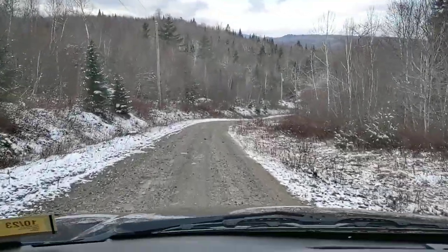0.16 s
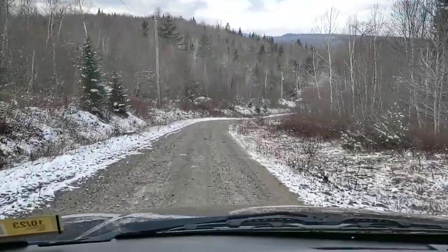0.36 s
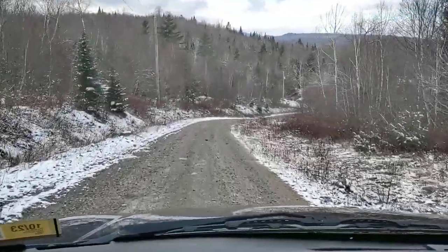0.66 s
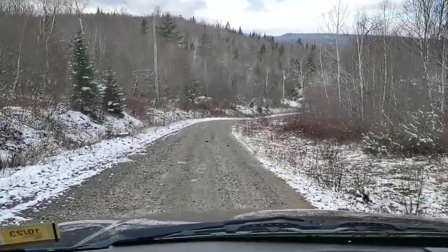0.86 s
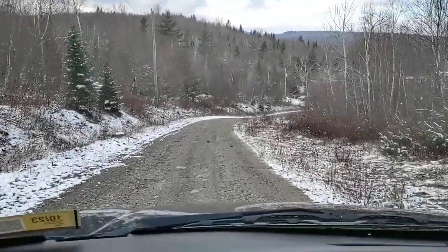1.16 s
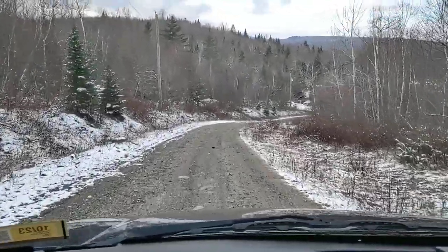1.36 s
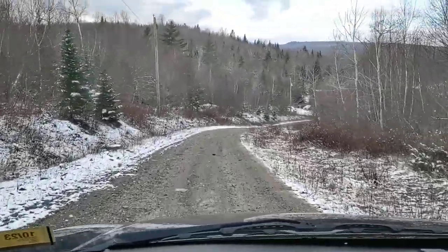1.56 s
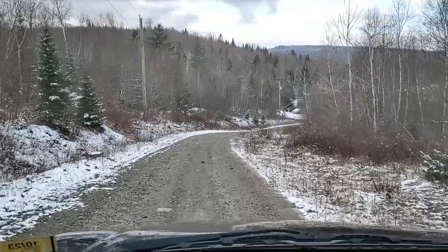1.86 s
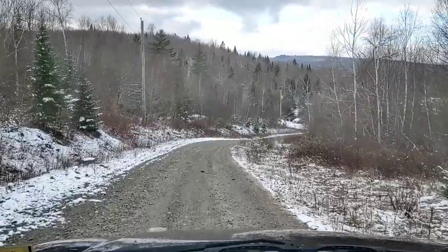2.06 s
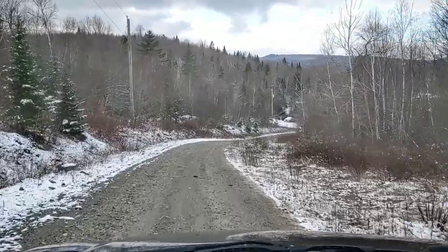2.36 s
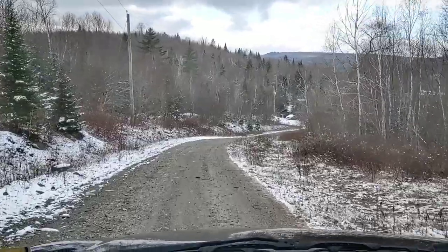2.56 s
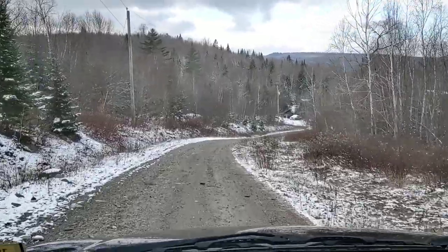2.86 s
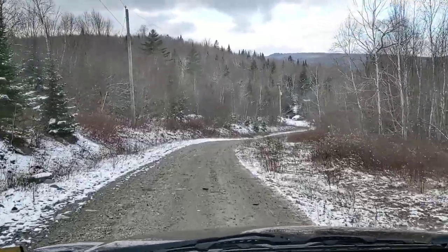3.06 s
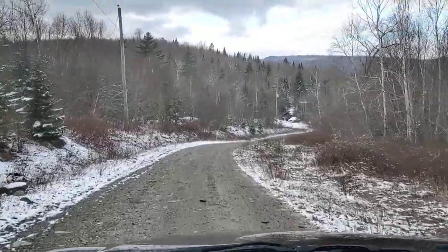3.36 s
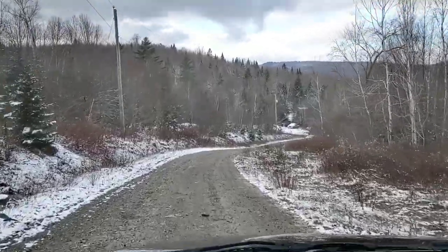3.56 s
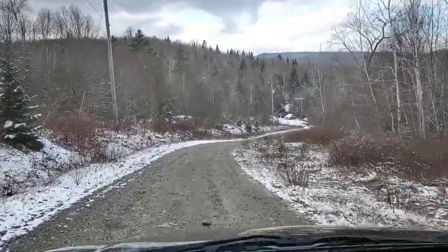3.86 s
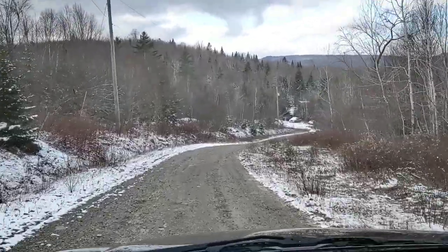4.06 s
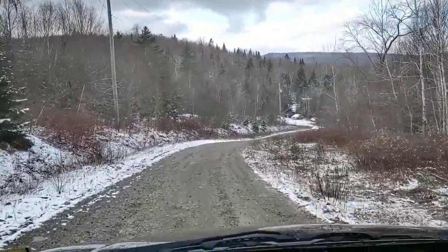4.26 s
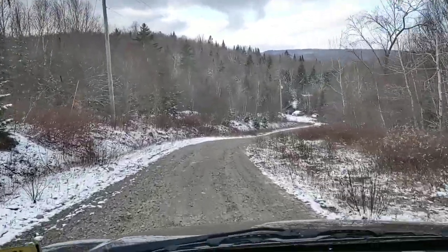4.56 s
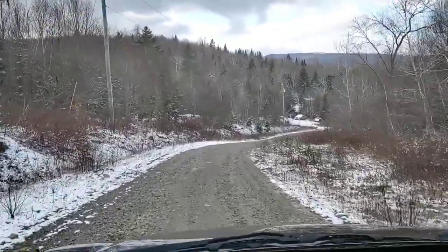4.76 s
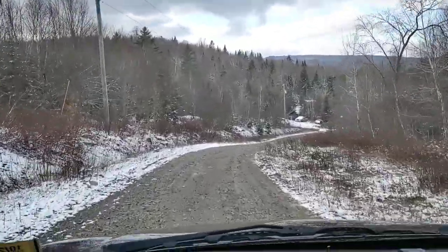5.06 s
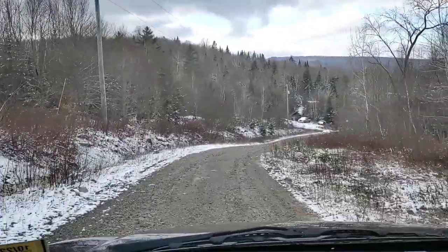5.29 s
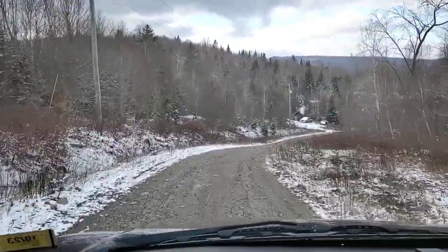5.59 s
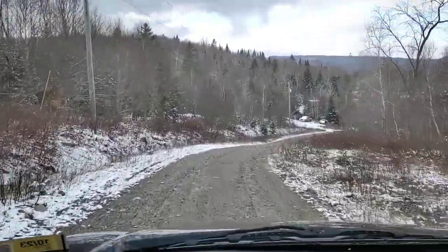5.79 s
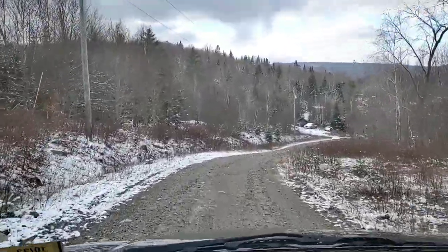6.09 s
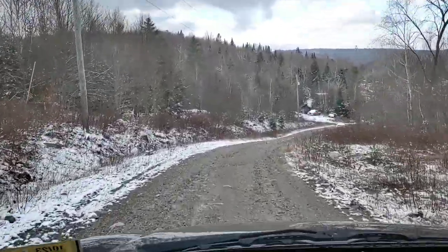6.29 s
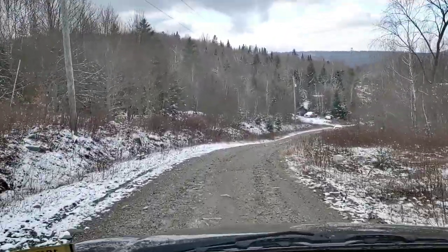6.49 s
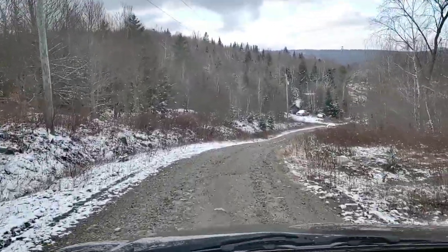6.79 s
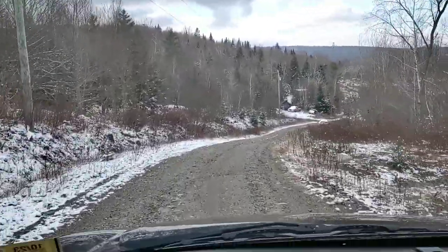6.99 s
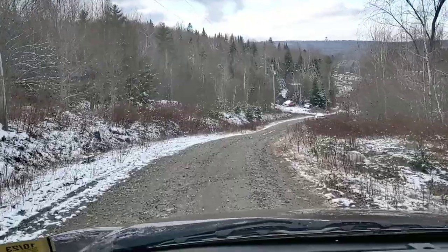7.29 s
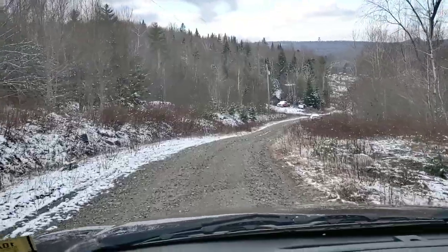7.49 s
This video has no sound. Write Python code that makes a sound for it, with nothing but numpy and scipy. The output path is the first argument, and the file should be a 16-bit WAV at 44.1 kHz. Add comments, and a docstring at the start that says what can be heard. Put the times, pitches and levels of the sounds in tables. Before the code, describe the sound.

Low droning cabin rumble as a vehicle rolls over gravel, with fine crunching and irregular clicks and knocks of stones striking the underbody.

```python
"""Inside a car rolling along a gravel road. The tyres shake the body: resonances boom and drone in the cabin.
Bumps thud as damped low tones; gravel crunches under the treads as noise, pings and short ticks.
Thrown stones tick and knock on the floor panels and wheel arches, noise bursts exciting panel modes.
The drive line whines faintly, a tone of wandering pitch; a narrow hiss of filtered noise shows at first."""
import sys
import numpy as np
from scipy import signal
from scipy.fft import rfft, irfft, next_fast_len
from scipy.io import wavfile
from scipy.ndimage import uniform_filter1d, map_coordinates

SR = 44100
rng = np.random.default_rng(int(sys.argv[2]) if len(sys.argv) > 2 else 0)


def dump_mix(stems):
    """Bounce the given channels to the path in sys.argv[1] as a 16-bit WAV at rate SR."""
    frames = np.atleast_2d(stems).T  # one column per channel
    limited = np.clip(frames, -1, 1)  # hard clip at full scale
    pcm = np.round(limited * 32767).astype(np.int16)
    wavfile.write(sys.argv[1], SR, pcm)


N = 336924

# Road roughness, as the body drone's level before fast shaking: time_s, level_db
ROAD_ROUGHNESS = [(0, -61.5), (.57, -60), (.66, -55), (.72, -62), (.86, -60), (.94, -53), (1.08, -51),
                  (1.25, -55), (1.45, -58.5), (1.62, -49), (1.8, -52.5), (2.2, -53.5), (2.62, -53.5),
                  (2.68, -59), (2.76, -54.5), (3.02, -56.5), (3.27, -48), (3.37, -54.5), (3.55, -54.5),
                  (3.85, -51.5), (4.04, -55), (4.19, -58.5), (4.4, -54.5), (4.7, -60), (5.13, -59),
                  (5.3, -53.5), (5.62, -53.5), (5.79, -53.5), (6.11, -53), (6.26, -52.5), (6.94, -52.5),
                  (7.17, -56), (7.34, -53.5), (7.64, -55)]
# Cabin boom relative to the drone: time_s, excess_db
BOOM_EXCESS = [(0, 0.5), (.3, 8), (.78, 0.5), (1.08, 2), (1.3, 4.5), (1.62, 6), (2.0, 5.5), (2.62, 3),
               (2.85, 9.5), (3.2, 0), (3.68, 2.5), (4.0, 9), (4.19, 3.5), (4.38, 10), (4.55, 2.5), (4.9, 6),
               (5.4, 9), (6.2, 7.5), (6.83, 1.5), (7.0, 11), (7.64, 3)]
# Crunch relative to what the roughness gives: time_s, excess_db
CRUNCH_EXCESS = [(0, 1), (.5, 2), (.82, 1), (1.1, 0), (1.4, 0), (1.7, 2.2), (2.1, 2), (2.55, 2), (2.9, 2),
                 (3.3, 0.1), (3.7, 0.7), (4.0, 2.5), (4.4, 0.1), (4.9, 0.5), (5.4, -0.5), (5.9, 2),
                 (6.4, 0), (6.9, 0.1), (7.1, 4.5), (7.25, -1.5), (7.4, 1.5), (7.64, -1.5)]
# Drive-line tone, before its fast wander: time_s, pitch_hz
WHINE_PITCH = [(0, 1133), (4.3, 1135), (4.8, 1122), (5.3, 1150), (6.6, 1112), (7.64, 1160)]
# Wheels dropping over bumps: start_s, pitch_hz, level_db (peak of the swell)
BUMPS = [(.608, 61.5, -44), (.652, 105, -45), (0.756, 88.5, -44), (.92, 51.5, -44), (.99, 66, -43),
         (1.056, 55, -40), (1.11, 55, -40), (1.6, 55, -34.5), (1.848, 59.3, -37), (5.399, 55, -41),
         (5.763, 64, -39), (6.642, 59.3, -36.5)]
# Thrown stones: arrival_s, strongest_pitch_hz, knock_db, crack_db, tick_db, left_over_right_db
STONES = [(0.352, 1040, -52.5, -64.5, -75.5, 0), (0.742, 1740, -69, -67, -101, 4),
          (0.934, 658, -56.5, -65, -81, 1), (0.959, 2000, -68, -67, -84, 6), (1, 1370, -59, -59, -73, 0),
          (1.0878, 210, -44, -69, -87, 1), (1.106, 172, -49, -74, -90, 0), (1.121, 2500, -63, -65, -90, -1),
          (1.154, 1330, -68, -61, -93, 1), (1.197, 1320, -59, -66, -81, 6),
          (1.4336, 629, -52, -57.5, -81, 1), (1.44, 1024, -54, -56.5, -72.5, -1),
          (1.501, 1940, -51, -64, -77, -2), (1.595, 423, -45, -62, -74, -1),
          (1.6055, 2910, -48.5, -57, -59, 6), (1.652, 1440, -55, -54, -92, 4.5),
          (1.72, 513, -46, -67, -76, 1), (1.87, 750, -49, -84, -96, 5), (1.9525, 1440, -44, -53.5, -94, 0),
          (1.967, 1520, -45.5, -58, -87, 2), (2.148, 710, -44, -46, -58, 2.5),
          (2.2038, 2620, -64, -52.5, -63, 3.5), (2.2145, 710, -48.5, -56.5, -86, 1),
          (2.247, 2440, -65, -61, -86, 5), (2.444, 1470, -49, -53.5, -74, 4.5),
          (2.4535, 1400, -48.5, -59, -80, 0), (2.471, 565, -43.5, -77, -93, -0.5),
          (2.479, 860, -45.5, -72, -93, 1), (2.488, 520, -46.5, -77, -93, 0),
          (2.529, 2870, -75, -65, -87, 1), (2.563, 4570, -82, -73, -73, -1),
          (2.574, 2900, -75, -71, -70, 0), (2.654, 4430, -75, -70, -68.5, 0),
          (2.729, 694, -64, -71, -78, -3), (2.99, 1480, -60, -67, -98, -12),
          (3.117, 1300, -70, -61.5, -67.5, 1), (3.139, 1330, -61, -60, -85, 4),
          (3.2, 816, -56.5, -55.5, -92, 5), (3.271, 760, -53, -69, -92, 7),
          (3.528, 1500, -50, -52.5, -70, -1), (3.543, 910, -60, -63, -87, 0),
          (3.5701, 2390, -75, -48, -70, 1.5), (3.582, 3030, -75, -59, -79, -1),
          (3.627, 1500, -60, -72, -90, 0), (3.651, 2940, -79, -63, -93, -4),
          (3.7062, 382, -59, -74, -83, -8), (3.738, 1445, -58, -60, -74, 2),
          (3.753, 2030, -63, -62, -69, 3), (3.789, 720, -50.5, -61, -83, 1),
          (3.838, 3070, -53, -57.5, -66, 2), (3.974, 655, -69, -82, -84, -3),
          (4.249, 563, -58, -81, -94, -7), (4.3054, 747, -42.5, -47.5, -63, -1),
          (4.498, 730, -58, -79, -91, -3), (4.957, 3760, -57.5, -70, -81, -1),
          (5.311, 1940, -53.5, -71, -77, 5), (5.371, 663, -56, -78, -87, 0),
          (5.598, 2400, -70, -66, -71, 1), (5.7606, 1870, -65, -66, -78, 0),
          (5.8576, 1670, -50.5, -62, -74, 1), (5.895, 1300, -59, -64, -82, -2),
          (6.042, 1920, -64, -64, -68, 6), (6.109, 1210, -58, -58.5, -74, 2),
          (6.159, 530, -53, -67, -81, 3), (6.2, 1990, -51, -71, -75, 1), (6.371, 5740, -70, -77, -68.5, 1),
          (6.406, 2250, -69, -69, -78, -1), (6.449, 400, -49.5, -81, -90, 1),
          (6.517, 560, -54.5, -66, -79, 2), (6.608, 297, -49, -82, -90, -2), (6.64, 1970, -69, -71, -84, 2),
          (6.698, 1390, -68, -62, -73, 2), (6.789, 1320, -69, -67, -79, -3),
          (6.856, 2140, -52.5, -72, -69, 0), (6.885, 4900, -71, -77, -65.5, 2),
          (6.915, 721, -56, -72, -86, -1), (6.934, 2020, -68, -78, -86, 3),
          (7.035, 1320, -58, -70, -90, -1), (7.07, 628, -56, -68, -88, 0),
          (7.1192, 1190, -67, -66, -87, -2), (7.209, 1260, -67, -63, -82, 0),
          (7.294, 1950, -55, -71, -82, -3), (7.506, 1230, -73, -56, -74, 1.5)]
# Modes of the struck panels: centre_hz, width_hz, gain_db
PANEL_MODES = [(200, 90, -6), (376, 138, -0.5), (494, 102, 1.5), (741, 98, -2), (1006, 164, -4),
               (1167, 194, -1), (1490, 300, -0.5), (2195, 580, 1.5), (2970, 580, 1), (3810, 720, -0.5),
               (4610, 840, 2.5), (5960, 2040, -2.5), (7260, 610, 0.5), (9500, 1800, -5.5)]
# Three bands of a stone's blow (knock, crack, tick): low_edge_hz, high_edge_hz
BLOW_BANDS = [(140, 1000), (1000, 3400), (3400, 13000)]
# Build-up time constant of each band; the low ring takes longest: rise_s
BAND_RISE_S = [0.0025, 0.0003, 0.00046]
# Extra decay of each band; the higher bands die sooner: fade_db_per_s
BAND_FADE_DB_PER_S = [-3, 127, 380]
# Relative noise spectra of boom, suspension shudder, drone and crunch: frequency_hz, density_db_per_hz
BOOM_SPECTRUM = [(15, -42), (25, -13), (36, -6.5), (50, 1.5), (62, -4.5), (75, -8.5), (100, -20.5),
                 (200, -120)]
SHUDDER_SPECTRUM = [(50, -23.5), (78, 1), (110, -3), (146, -4), (204, -26.5), (300, -39), (510, -120)]
DRONE_SPECTRUM = [(100, -31.5), (170, -0.5), (210, -8.5), (311, -3), (391, -8), (441, -8), (569, -6),
                  (716, -7.5), (828, -9), (1020, -18), (1300, -23), (1690, -42.5), (2860, -120)]
CRUNCH_SPECTRUM = [(530, -27), (900, -8), (1030, -6), (1240, -4), (1430, -9), (2450, -11), (3190, -16.5),
                   (7200, -30.5), (8130, -34), (12500, -40.5), (16200, -77), (22000, -120)]
# Relative strength of a pebble's ping: frequency_hz, level_db
PEBBLE_STRENGTH = [(500, 0), (1500, 3), (3000, -10), (7000, -17), (11000, -24)]
# Likeness (correlation) of left and right: frequency_hz, likeness (no unit)
LIKENESS = [(30, 0.98), (125, 1), (250, 0.85), (500, 0.77), (900, 0.4), (2000, -0.2), (8000, 0.072)]
# Balance of the microphone: frequency_hz, left_over_right_db
BALANCE = [(60, -1), (170, -1.5), (500, -1), (1440, 2.5), (4170, 0), (12000, -0.5)]

ROUGH_DB = -55  # drone level of an average stretch of road
CRUNCH_DB, CRUNCH_GROWTH = -71, 1.1  # reference level at ROUGH_DB; dB per dB of drone
HISS_PEAK_S, HISS_PEAK_DB, HISS_SLOPE_DB_PER_S = 0.48, -74, 41
BUMP_CYCLES = 0.98  # cycles until a thud is at its strongest
SWELL_S = 0.0035  # time to the peak of a 730 Hz blow
TAIL_DB, TAIL_T60_S = -3.5, 0.17  # tail of a blow beside its swell
TONE_SHARE, TONE_CORNER_HZ = 1.5, 1100  # struck spot's note over the panel ring; weak on high spots
TONE_WANDER_CYCLES = 0.006  # random phase step per sample at 730 Hz
TOP_HZ = 12750


def amp(db):
    """The decibel law: level to amplitude ratio."""
    return 10 ** (np.asarray(db) / 20)


def unit(x):
    """Normalisation to an rms of 1."""
    return x / np.sqrt(np.mean(x ** 2) + 1e-20)


def along(points, hz):
    """Interpolation on a logarithmic frequency axis."""
    f, v = np.transpose(points)
    return np.interp(np.log(hz + 1), np.log(f + 1), v)


def curve(rows):
    """Linear interpolation in time, one value per sample."""
    s, v = np.transpose(rows)
    return np.interp(np.arange(N) / SR, s, v)


def wobble(rate):
    """Smooth random fluctuation: a spline through rate random knots a second."""
    knots = rng.standard_normal(int(N * rate / SR) + 4)
    return map_coordinates(knots, [np.arange(N) * rate / SR])


def filtered(x, response):
    """Linear filtering: the spectrum is multiplied by a complex response."""
    n = x.shape[-1]
    m = next_fast_len(n + 8192)
    return irfft(rfft(x, m) * response(np.fft.rfftfreq(m, 1 / SR)), m)[..., :n]


def resonance(f, hz, width_hz):
    """Damped resonance: one mode with gain 1 at its centre."""
    return 1j * f * width_hz / (hz * hz - f * f + 1j * f * width_hz)


def swell(t, peak_s, steep):
    """Build-up and decay: an envelope rising to 1 at peak_s, then dropping away."""
    u = t / peak_s
    return (u * np.exp(1 - u)) ** steep


def spread(pair, gain):
    """Interaural correlation: sum and difference of unrelated signals, bass alike, treble unrelated."""
    turn = lambda hz: np.arccos(np.clip(along(LIKENESS, hz), -1, 1)) / 2
    mid, side = filtered(pair, lambda hz: gain(hz) * [np.cos(turn(hz)), np.sin(turn(hz))])
    return np.array([mid + side, mid - side])


def rush(spectrum, patchy_db):
    """Shaped noise: stereo of rms 1, with random gain over patches of time and frequency."""
    z = signal.stft(rng.standard_normal((2, N)), nperseg=256)[2]
    field = uniform_filter1d(rng.standard_normal(z.shape[1:]), 10, 0)
    field = uniform_filter1d(field, 6, 1)
    pair = signal.istft(z * amp(patchy_db * unit(field)), nperseg=256)[1][:, :N]
    return unit(spread(pair, lambda hz: amp(along(spectrum, hz))))


def hiss():
    """Band-pass noise: a faint band near 2 kHz swells once and fades."""
    db = HISS_PEAK_DB - HISS_SLOPE_DB_PER_S * abs(np.arange(N) / SR - HISS_PEAK_S)
    noise = rng.standard_normal((2, N))
    return amp(db) * unit(filtered(noise, lambda f: resonance(f, 1950, 260) ** 2))


def whine():
    """Frequency modulation: a thin gear tone whose pitch and level waver."""
    hz = curve(WHINE_PITCH) + 7 * wobble(25)
    phase = 2 * np.pi * np.cumsum(hz) / SR
    return amp(-82 + 3 * wobble(5)) * np.sin(phase + [[0], [1.2]])


def boom(drone_db, jolt):
    """Cabin resonance: deep noise follows the road's roughness."""
    return amp(drone_db + curve(BOOM_EXCESS) + 0.25 * jolt) * rush(BOOM_SPECTRUM, patchy_db=0.0)


def shudder(drone_db, jolt):
    """Suspension vibration: low noise grows a little less than the drone."""
    db = -53.5 + 0.95 * (drone_db - ROUGH_DB) + 2.0 * jolt
    return amp(db) * rush(SHUDDER_SPECTRUM, patchy_db=1.8)


def thump(drone_db):
    """Nonlinear growth: the tyre cavity near 170 Hz gains out of proportion on the roughest stretches."""
    modes = lambda f: resonance(f, 170.4, 41) ** 2 + 0.72 * resonance(f, 256.3, 70) ** 2
    cavity = filtered(rng.standard_normal(N), modes)
    return amp(-67 + 2.98 * (drone_db - ROUGH_DB)) * unit(cavity)


def drone(drone_db, jolt, shake):
    """Structure-borne sound: body noise modulated by slow jolts and faster shakes."""
    return amp(drone_db + 0.68 * jolt + 0.73 * shake) * rush(DRONE_SPECTRUM, patchy_db=1.5)


def pebbles(rate, spread_db, t60):
    """Damped free vibration: pebbles ping the underside at random pitches, shorter when high."""
    draws = rng.random((int(rate * N / SR), 5)).T[:, :, None]
    when, size, pitch, left, right = draws
    hz = 500 * 22 ** pitch
    k = np.arange(SR // 90)
    t = k / SR
    strength = amp(along(PEBBLE_STRENGTH, hz) - spread_db * np.log(0.036 + size))
    decay = amp(-60 * t / t60 * np.sqrt(hz / 2000))  # t60 holds at 2 kHz
    shape = strength * decay * (1 - np.exp(-t / 0.0006))
    at = ((when * N).astype(int) + k).ravel()
    sides = []
    for start_cycles in (left, right):
        ping = shape * np.sin(2 * np.pi * (hz * t + start_cycles))
        sides.append(np.bincount(at, ping.ravel(), N)[:N])
    return unit(np.array(sides))


def crackle(rate, spread_db, peak_s):
    """Impulsive noise: stones snap under the treads in short broad ticks, a few much louder."""
    when, size = rng.random((int(rate * N / SR), 2)).T
    snaps = np.bincount((when * N).astype(int), amp(-spread_db * np.log(0.03 + size)), N)
    gate = signal.fftconvolve(snaps, swell(np.arange(SR // 40) / SR, peak_s, 0.89))[:N]
    return unit(gate * rush(CRUNCH_SPECTRUM, patchy_db=4.5))


def crunch(drone_db, jolt, shake):
    """Superposition of many contacts: gravel noise, pings and ticks grow with roughness."""
    db = CRUNCH_DB + CRUNCH_GROWTH * (drone_db - ROUGH_DB) + curve(CRUNCH_EXCESS)
    grind = amp(2.5 + 1.87 * jolt + 0.53 * shake) * rush(CRUNCH_SPECTRUM, patchy_db=2.0)
    pings = amp(-0.2) * pebbles(rate=600, spread_db=2.0, t60=0.0089)
    ticks = amp(-4.0) * crackle(rate=70, spread_db=4.0, peak_s=0.0021)
    return amp(db) * (grind + pings + ticks)


def rolling():
    """Common excitation: one road roughness drives all the tyre sounds; most share its jolts."""
    drone_db = curve(ROAD_ROUGHNESS)
    jolt, shake = wobble(14), wobble(45)
    body = boom(drone_db, jolt) + shudder(drone_db, jolt) + thump(drone_db)
    return body + drone(drone_db, jolt, shake) + crunch(drone_db, jolt, shake)


def bumps():
    """Transient response: each bump is a short low thud of the body, alike on both sides."""
    out, t = np.zeros(N + SR), np.arange(SR // 6) / SR
    for start_s, hz, db in BUMPS:
        tone = np.sin(2 * np.pi * (hz * t + rng.random()))
        out[round(start_s * SR):][:len(t)] += amp(db) * swell(t, BUMP_CYCLES / hz, 1.6) * tone
    return out[:N]


def panel(f):
    """Modal superposition: sheet-metal modes summed with alternating sign."""
    return sum((-1) ** k * amp(db) * resonance(f, hz, width)
               for k, (hz, width, db) in enumerate(PANEL_MODES))


def struck_panel(f, hz):
    """Modal excitation: modes around the struck spot's pitch are fed most, high modes least."""
    modes = panel(f)
    near = 1 + 1.1 * abs(resonance(f, hz, 1.1 * hz))
    return modes * abs(modes) ** 0.37 * near * (1 + f / 3500) ** -1.1 / (1 + (f / 8000) ** 2)


def blow_bands(f):
    """Band-pass filtering: gains that divide a blow into knock, crack and tick."""
    return [[(1 + (lo / (f + 1)) ** 8) ** -.5 * (1 + (f / hi) ** 8) ** -.5] for lo, hi in BLOW_BANDS]


def stones():
    """Multipath impact: each stone's burst swells for a few ms, rings the panels and dies."""
    out, t = np.zeros((2, N + SR)), np.arange(SR // 8) / SR
    for arrival_s, hz, knock_db, crack_db, tick_db, pan_db in STONES:
        hump = swell(t, SWELL_S * (730 / hz) ** 0.41, 1)  # low spots are slower to speak
        tail = (1 - np.exp(-t / SWELL_S)) * amp(TAIL_DB - 60 * t / TAIL_T60_S)
        burst = (hump + tail) * rng.standard_normal((2, len(t)))
        ring = unit(spread(burst, lambda f: struck_panel(f, hz)))
        # the struck spot's own note, slightly unsteady, reaching one side a little earlier
        drift = TONE_WANDER_CYCLES * hz / 730 * np.cumsum(rng.standard_normal(len(t)))
        cycles = hz * t + drift + rng.random() + [[0], [.12]]
        note = unit(hump ** 2 * np.sin(2 * np.pi * cycles))
        ring = ring + TONE_SHARE / (1 + (hz / TONE_CORNER_HZ) ** 2) * note
        fade = amp(-np.outer(BAND_FADE_DB_PER_S, t))
        rise = 1 - np.exp(-t / np.c_[BAND_RISE_S])
        bands = filtered(ring, blow_bands) * (fade * rise)[:, None]
        # band levels refer to the rms of the first 12 ms, before panning
        first = np.sqrt(np.mean(bands[..., :SR // 80] ** 2, axis=(1, 2)))
        blow = np.tensordot(amp([knock_db, crack_db, tick_db]) / first, bands, axes=1)
        start = round((arrival_s - .0015) * SR)  # the burst begins 1.5 ms ahead of arrival_s
        out[:, start:][:, :len(t)] += blow * amp([[pan_db / 2], [-pan_db / 2]])
    return out[:, :N]


def scene():
    """Linear superposition of all sources in the cabin."""
    return hiss() + whine() + rolling() + bumps() + stones()


def record(dry):
    """Transducer response: the microphone drops deep bass, leans by frequency and stops at TOP_HZ."""
    bass = lambda hz: (1 + (26 / (hz + 1)) ** 6) ** -.5
    lean = lambda hz: amp(np.outer([.5, -.5], along(BALANCE, hz)))
    out = filtered(dry, lambda hz: lean(hz) * bass(hz) * (hz < TOP_HZ))
    return out + amp(-103) * rng.standard_normal(dry.shape)  # noise of the converter


dry = scene()
out = record(dry)
dump_mix(out)
```